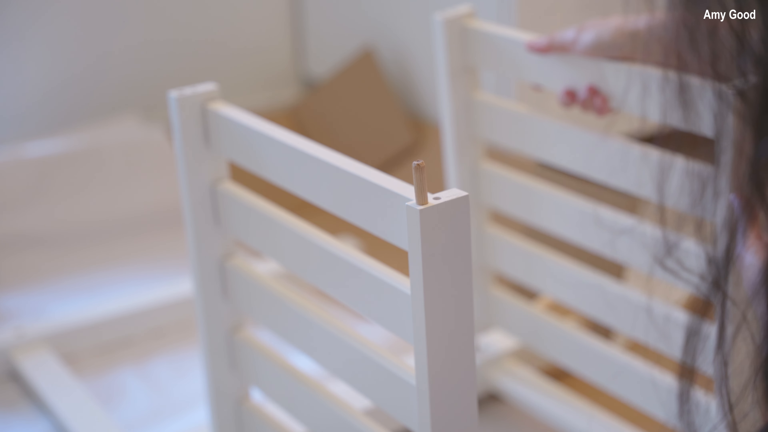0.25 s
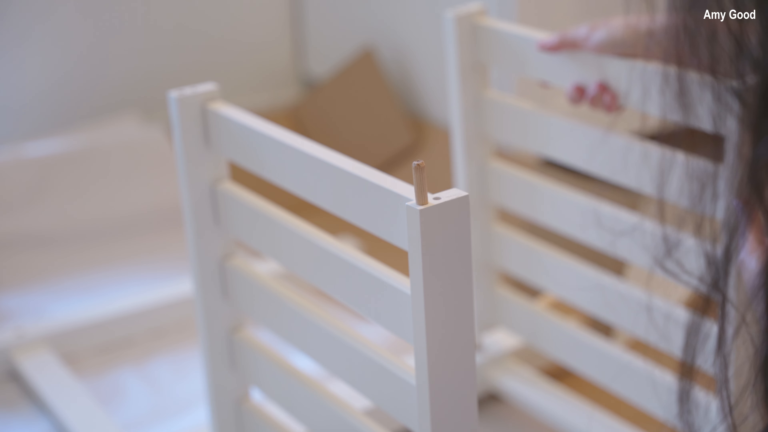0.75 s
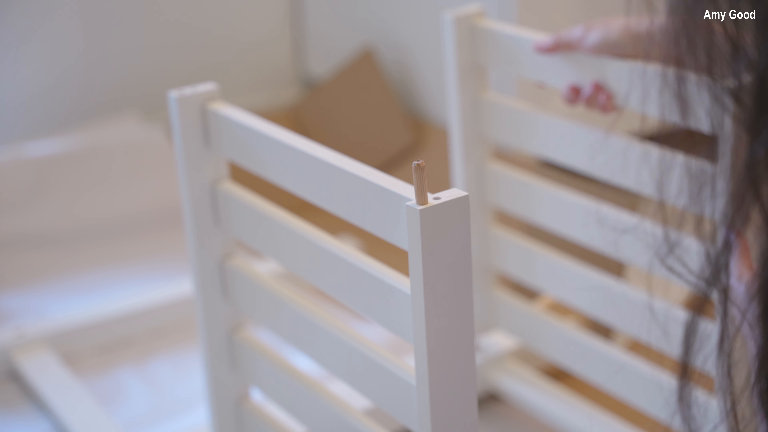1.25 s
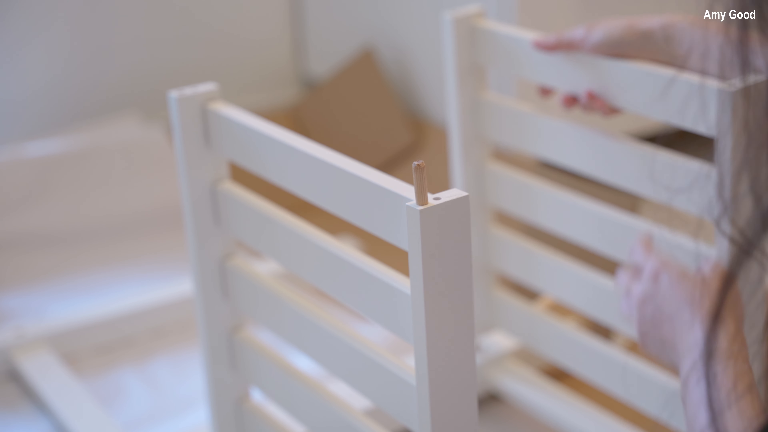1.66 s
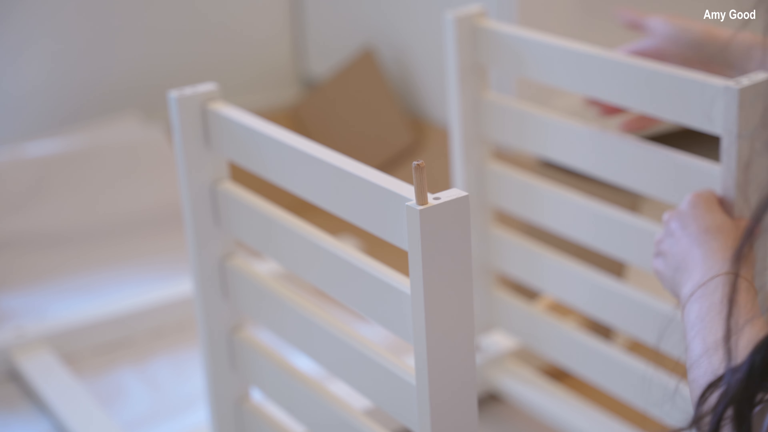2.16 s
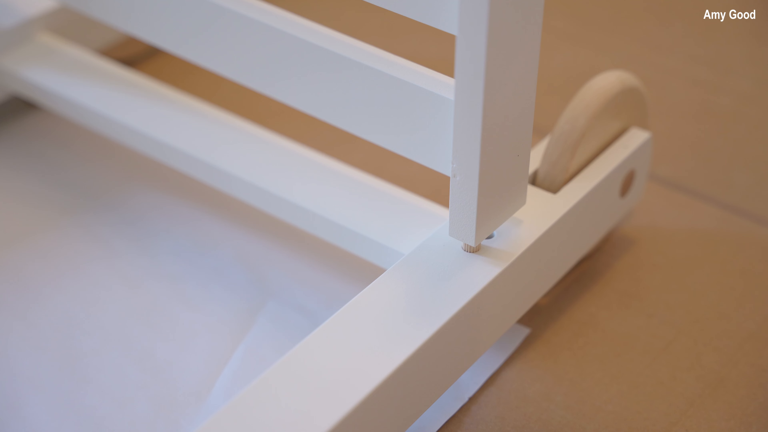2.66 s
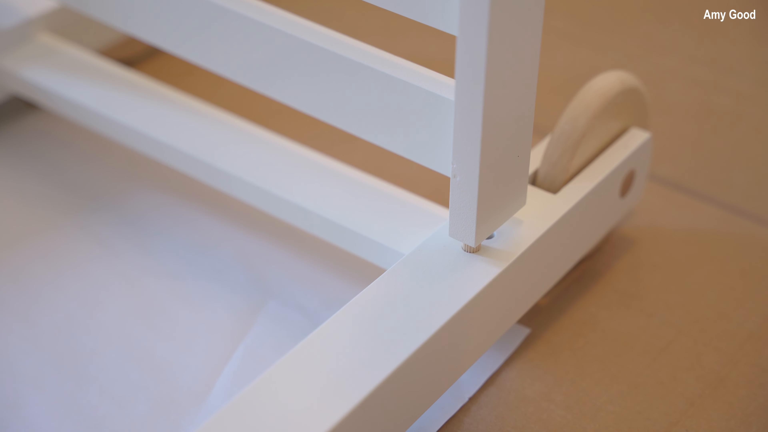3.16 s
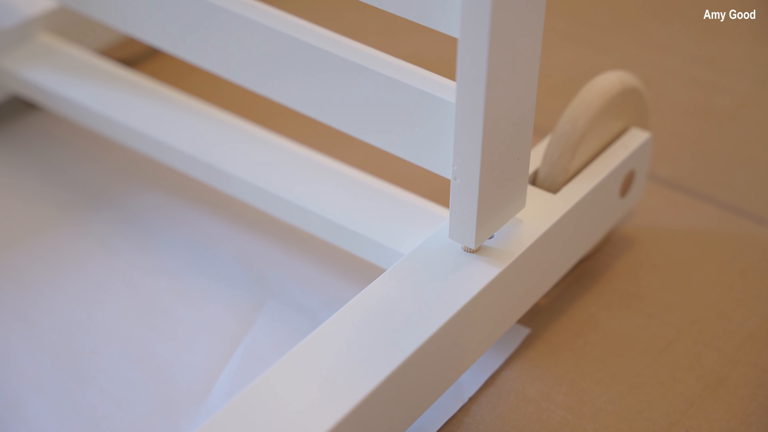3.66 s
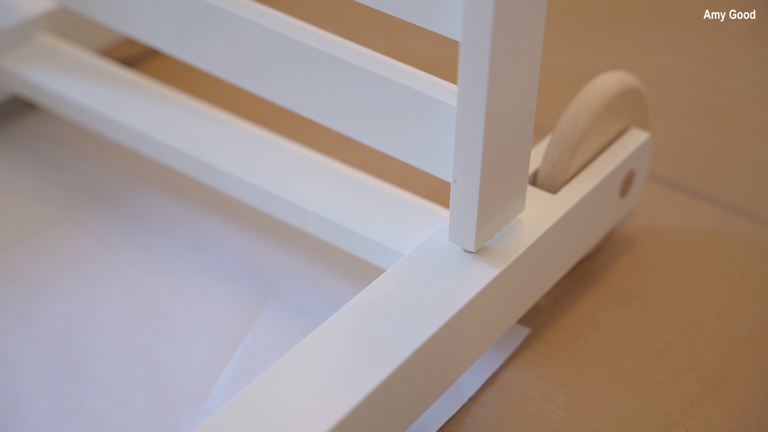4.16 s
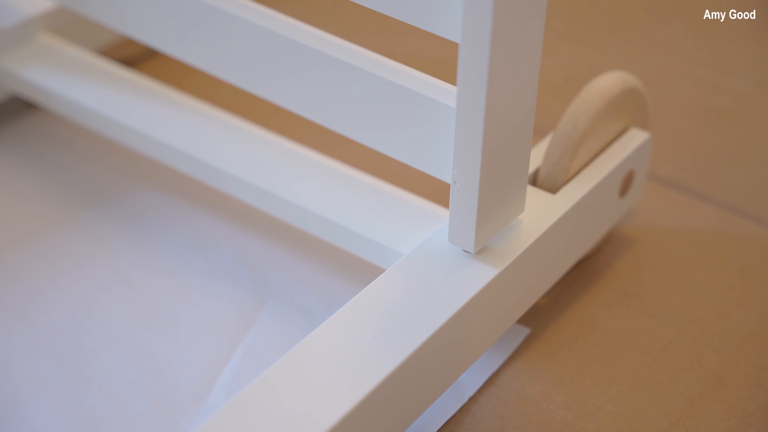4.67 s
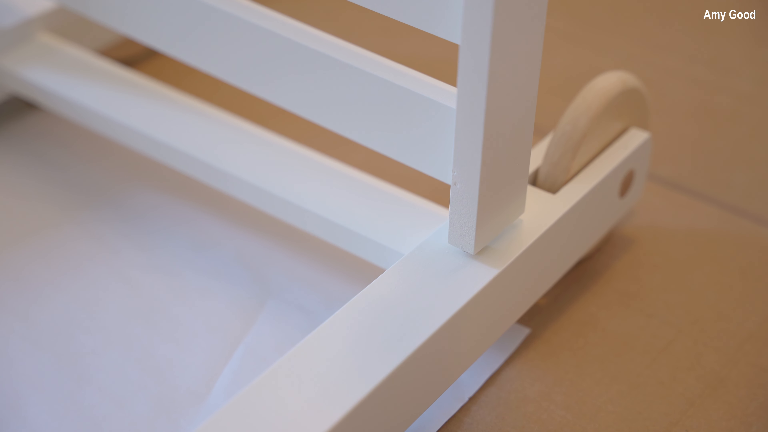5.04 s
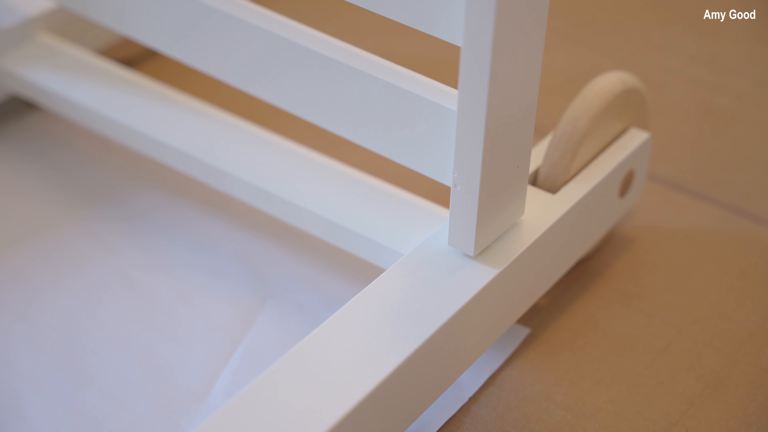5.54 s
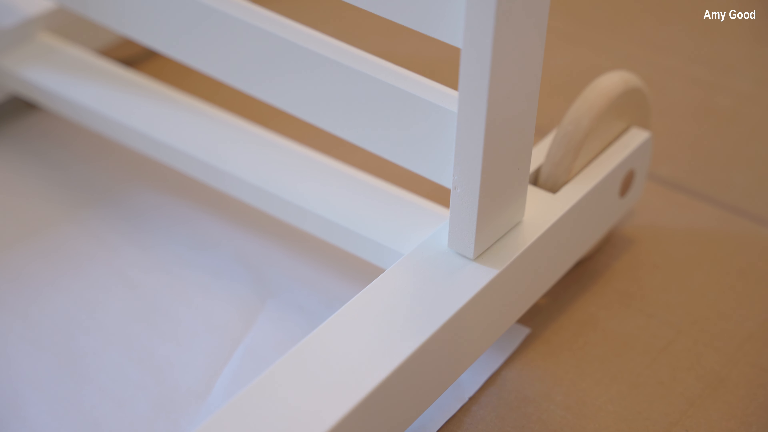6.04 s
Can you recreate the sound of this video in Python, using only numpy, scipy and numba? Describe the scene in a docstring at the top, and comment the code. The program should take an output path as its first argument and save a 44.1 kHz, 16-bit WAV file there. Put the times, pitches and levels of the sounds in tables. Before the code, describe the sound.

Faint, steady air noise fills a bare, reverberant room. For the first three seconds, hands quietly position the painted panels of a wooden furniture frame. The loose joints give light knocks and ticks around 0.2 to 0.5 seconds and again from 1 to 1.2 seconds, with a brief low scuff on the floor. Smaller ticks follow near 1.8 seconds, and very soft rubbing continues until about 2.7 seconds.

At 3 seconds a rubber mallet begins driving a dowelled joint home, much louder than the handling. Eight evenly paced blows land at roughly 3.0, 3.5, 3.9, 4.4, 4.8, 5.2, 5.6 and 6.1 seconds. The first is a little softer; the rest are similar in strength, varying slightly in brightness. Each combines a woody thud with little bass, a sharp clack and a slight ring, with room echo swelling just afterwards and fading within about half a second.

```python
"""In a bare, live room, a rubber mallet drives home the dowelled post of a wooden furniture frame.
Over faint air noise, hands first rub and shift the panels, and the slipping joints knock and tick.
Eight evenly paced blows follow. Each is a thud of the frame's damped modes, a clack as the dowel
slips and a wash of reverberation; a limiter ducks the attack, so the room swells up after it."""
import sys
import numpy as np
from scipy import signal
from scipy.fft import rfft, irfft
from scipy.io import wavfile
from scipy.ndimage import map_coordinates
from numba import njit

SR = 44100
rng = np.random.default_rng(int(sys.argv[2]) if len(sys.argv) > 2 else 0)


def master_out(mix):
    """Clip the mix to full scale and print it as 16-bit PCM to the path in sys.argv[1]."""
    frames = np.transpose(np.atleast_2d(mix))
    ceiling = np.clip(frames, -1, 1)
    pcm = np.round(ceiling * 32767).astype(np.int16)
    wavfile.write(sys.argv[1], SR, pcm)


N = 277830
T = np.arange(int(.9 * SR)) / SR  # time axis of one impact, s
HZ = np.maximum(np.fft.rfftfreq(len(T), 1 / SR), 1)  # its frequency axis


def undb(db):
    """Amplitude ratio of a level in decibels."""
    return 10 ** (np.asarray(db) / 20)


def unit_energy(x):
    """Normalisation to the energy of 5 ms at full level."""
    return x * np.sqrt(.005 * SR / np.sum(x ** 2))


def lookup(points, hz):
    """Interpolation of (frequency, value) points on a logarithmic frequency axis."""
    points_hz, values = np.transpose(points)
    return np.interp(np.log(np.maximum(hz, 1)), np.log(points_hz), values)


def decay(t60_s):
    """Exponential damping: the level falls 60 dB in t60_s."""
    return np.exp(-np.log(1000) * T / t60_s)


def resonance(hz, width_hz):
    """Lorentzian power response of one damped resonator."""
    return 1 / (1 + (2 * (HZ - hz) / width_hz) ** 2)


def colour(x, gain_db):
    """Minimum-phase filtering: folding the cepstrum makes the response causal."""
    cepstrum = irfft(np.log(undb(gain_db)), len(T))
    cepstrum[1:len(T) // 2] *= 2
    cepstrum[len(T) // 2:] = 0
    response = irfft(np.exp(rfft(cepstrum)), len(T))
    return signal.fftconvolve(x, response)[:len(T)]


def add(track, start_s, x):
    """Superposition of a sound on the track from start_s."""
    start = int(start_s * SR)
    track[start:start + len(x)] += x[:N - start]


# spectrum of the air noise: frequency_hz, relative_db
AIR_SPECTRUM = [(25, -28), (50, -24), (85, -15.5), (125, -13), (200, -6.5), (280, -1), (450, -8.5),
                (750, -13), (1100, -15), (2100, -21), (4000, -29), (7500, -30.5), (15500, -27.5)]
# narrow peaks added to it: pitch_hz, width_hz, relative_db
AIR_DRONE = [(120, 10, 4), (280, 17, -1.5), (533, 15, 6.5), (628, 13, 9.5), (840, 8.9, 13.5)]

def room_tone(level_db=-59.5, waver_db=0.52):
    """Spectrally shaped noise: the low, steady air of the house, with a faint drone and hiss."""
    drone = sum(undb(db) ** 2 * resonance(hz, width_hz) for hz, width_hz, db in AIR_DRONE)
    gain = undb(lookup(AIR_SPECTRUM, HZ)) * np.sqrt(1 + drone)
    noise = rfft(rng.standard_normal(N))
    air = irfft(noise * np.interp(np.fft.rfftfreq(N, 1 / SR), HZ, gain), N)
    drift = signal.resample(rng.standard_normal(40), N)
    return air / np.std(air) * undb(level_db + waver_db * drift)


# rubs of hands on paint and, lowest, of a panel on the floor:
# middle_s, length_s, level_db, centre_hz, width_octaves
RUBS = [(.455, 0.075, -66, 6370, .3), (1.064, 0.081, -53, 130, 2.5), (1.76, 0.65, -67.5, 1300, 1.6),
        (2.28, 0.31, -68, 2400, 1.4), (2.597, 0.23, -63.5, 2000, 1.27)]

def rubbing(grip_db=3, edge_drop_db=10):
    """Stick-slip friction: skin or floor catches on painted wood, in rubs that swell and fade."""
    out, t = np.zeros(N), np.arange(N) / SR
    hz = np.maximum(np.fft.rfftfreq(N, 1 / SR), 1)
    noise = rng.standard_normal(N)
    grip = undb(grip_db * signal.resample(rng.standard_normal(2500), N))
    grains = rfft(noise * grip)
    for middle_s, length_s, level_db, centre_hz, width_octaves in RUBS:
        band = np.exp(-.5 * (np.log2(hz / centre_hz) / width_octaves) ** 2)
        hiss = irfft(grains * band, N)
        swell_db = -edge_drop_db * (2 * (t - middle_s) / length_s) ** 2
        out += hiss / np.std(hiss) * undb(level_db + swell_db)
    return out


# reverberation time of the room: frequency_hz, t60_s
ROOM_DECAY = [(80, 0.61), (210, 0.32), (560, 0.47), (1500, 0.6), (3900, 0.55), (10000, 0.43), (15000, 0.41)]

def reverberation(early_db=-2.0, walls_s=0.023, build_s=0.0032):
    """Diffuse reflection: weak floor echoes, then wall echoes, each band dying at its own rate."""
    noise, echoes = rfft(rng.standard_normal(len(T))), 0
    centres_hz = np.geomspace(60, 16000, 12)
    for hz, weights in zip(centres_hz, np.eye(len(centres_hz))):
        band = np.interp(np.log(HZ), np.log(centres_hz), weights)
        echoes += irfft(noise * band, len(T)) * decay(lookup(ROOM_DECAY, hz))
    walls = np.clip((T - walls_s) / build_s, 0, 1)
    return echoes * undb(early_db * (1 - walls)) * np.minimum(T / build_s, 1)


def crack(decay_s):
    """Broadband excitation: a burst of dying noise, whitened and then tapered."""
    spectrum = rfft(rng.standard_normal(len(T)) * decay(decay_s))
    return irfft(spectrum / np.abs(spectrum), len(T)) * decay(4 * decay_s)


def modal_ripple(spacing_hz=130):
    """Modal overlap: the frame's many upper modes give random peaks and dips at each contact point."""
    heights = rng.standard_normal(600)
    return map_coordinates(heights, [HZ / spacing_hz], mode="mirror")


# modes of the slats, which answer light knocks: pitch_hz, width_hz, relative_db
SLAT_MODES = [(1077, 42, -4), (1640, 130, -3.5), (1894, 130, -1.5), (2546, 190, -2.5), (3514, 54, -3),
              (3940, 45, 0.5), (4130, 77, -5), (5300, 40, -34), (5830, 60, -12), (7200, 63, -9),
              (9200, 200, -15)]
# joints knocking under the hands: start_s, level_db, centre_hz
JOINT_KNOCKS = [(0.2317, -50, 3180), (0.2557, -34, 560), (0.2617, -41, 2730), (0.3926, -47, 2470),
                (0.481, -44, 2460), (.9818, -39.5, 2460), (1.0784, -49, 8000), (1.0943, -52, 4000),
                (1.2054, -35.5, 2600), (1.241, -34, 2540), (1.6283, -53, 3600), (1.791, -50, 6000),
                (1.8205, -47, 5000), (1.839, -44.5, 3400), (2.064, -52, 1900)]

def joint_knocks(tick_s=0.038, slats_db=11.0, ripple_db=3.5, wood_top_hz=11000, skirt_db=-31,
                 room_db=-8.5, room_top_hz=5500, settle_s=(.012, .022), settle_db=-12):
    """Impulse response: a slipping joint rings slats and room, then settles with a weaker slip."""
    out = np.zeros(N)
    room = unit_energy(colour(reverberation(), -10 * np.log10(1 + (HZ / room_top_hz) ** 4)))
    slats = sum(undb(db + slats_db) ** 2 * resonance(hz, width_hz) for hz, width_hz, db in SLAT_MODES)
    wood_db = 10 * np.log10((1 + slats) / (1 + (HZ / wood_top_hz) ** 6))
    for start_s, level_db, centre_hz in JOINT_KNOCKS:
        # bandwidth grows with the centre: slowly for dull knocks, fast for sharp ticks
        sharpness = np.log2(centre_hz / 2530)
        upper_octaves = 0.78 + max(0.17 * sharpness, 1.2 * sharpness)
        octaves = upper_octaves * np.where(HZ < centre_hz, 1.54, 1)  # wider below the centre
        contact_db = np.maximum(-3 * (np.log2(HZ / centre_hz) / octaves) ** 2, skirt_db)
        for delay_s, slip_db in [(0, 0), (rng.uniform(*settle_s), settle_db)]:
            slip = unit_energy(crack(tick_s)) + undb(room_db) * room
            knock = colour(slip, contact_db + wood_db + ripple_db * modal_ripple())
            add(out, start_s + delay_s, undb(level_db + slip_db) * unit_energy(knock))
    return out


# narrow resonances of wood and room: pitch_hz, relative_db
RINGING_MODES = [(69, -22), (107, -21), (174, -21), (266, -17), (322, -12), (541, -1), (584, -7), (637, -6),
                 (753, -7), (842, -7), (1275, -5), (1418, -2), (1876, -1), (2024, 0), (2069, -3),
                 (2112, -3), (2524, -2), (2600, -2), (3030, -4), (3071, -6), (3413, -9), (3461, -10),
                 (3504, -10), (4468, -16), (4834, -20), (5569, -18)]

def ringing(scatter_db=3.0, detune=0.00163, build_s=0.0031, t60_s=0.44):
    """Free vibration: lightly damped resonances outlast a blow and die about as slowly as the room."""
    tones = 0
    for hz, db in RINGING_MODES:
        gain = undb(db + scatter_db * rng.standard_normal())
        pitch_hz = hz * (1 + detune * rng.standard_normal())
        tones += gain * np.sin(2 * np.pi * (pitch_hz * T + rng.random()))
    return unit_energy(tones * decay(t60_s) * (1 - np.exp(-T / build_s)))


# damped modes of the frame: pitch_hz, width_hz, relative_db
FRAME_MODES = [(250, 130, -32), (464, 66, -7.5), (650, 140, 1), (740, 87, -11.5), (960, 31, -23.5),
               (1282, 59, -5), (1731, 79, -0.5), (1818, 77, -4.5), (2165, 83, -3), (2450, 84, 0.5),
               (2580, 176, 1.5), (3047, 70, -7), (3450, 100, -12.5), (4900, 150, -17)]

def frame_thud(scatter_db=2.0, detune=0.024, radiate_hz=380):
    """Modal superposition, varying with the spot struck; narrow slats radiate little bass."""
    modes = 0
    for k, (hz, width_hz, db) in enumerate(FRAME_MODES):
        gain = (-1) ** k * undb(db + scatter_db * rng.standard_normal())
        pitch_hz = hz * (1 + detune * rng.standard_normal())
        modes += gain * np.exp(-np.pi * width_hz * T) * np.sin(2 * np.pi * pitch_hz * T)
    radiation = signal.butter(2, radiate_hz, "high", fs=SR, output="sos")
    return unit_energy(signal.sosfilt(radiation, modes))


# spectrum of the reverberant wash: frequency_hz, relative_db
WASH_SPECTRUM = [(24, -69), (40, -27.5), (69, -22.5), (199, -13), (320, -9.5), (392, -8.5), (529, -2.5),
                 (942, -4), (2050, -0.5), (2320, -4.5), (2570, -3), (3220, -9), (5580, -18), (12800, -41),
                 (16000, -41)]
# spectrum of the joint's clack: frequency_hz, relative_db
CLACK_SPECTRUM = [(120, -63), (200, -12), (548, -0.5), (749, 11.5), (1080, -16.5), (2330, -4.5),
                  (3900, -4.5), (7540, -6.5), (9750, -17.5), (13100, -30), (16000, -11.5)]
# blows, brighter when square, each landing spot favouring one resonance:
# start_s, force_db, treble_db, favoured_hz
MALLET_BLOWS = [(3.0203, -6.5, -2, 1860), (3.4503, -2, -0.5, 2560), (3.9103, -2, 3.5, 2560),
                (4.352, -1.4, -0.9, 1300), (4.8263, -1.84, -1.5, 1790), (5.2402, -1.1, 1.2, 1550),
                (5.649, -2, -0.4, 2240), (6.0594, -1.74, 2.5, 3010)]

def mallet_blows(wash_db=1.0, ring_db=-6.0, ripple_db=2.23, repeat_share=0.55,
                 clack_db=-1.16, clack_growth=1.86, clack_lag_s=.0007, clack_s=0.0081,
                 bass_db=-0.84, bass_hz=550, treble_hz=3000, favoured_db=2.0):
    """Impact excitation: the frame thuds, the joint clacks as the dowel slips, and the room answers."""
    out, room, ripple = np.zeros(N), reverberation(), modal_ripple()
    # the frame shifts between blows, so its modes and echo pattern only partly repeat
    same, fresh = np.sqrt([repeat_share, 1 - repeat_share])
    for start_s, force_db, treble_db, favoured_hz in MALLET_BLOWS:
        tone_db = bass_db / (1 + (HZ / bass_hz) ** 2) + treble_db / (1 + (treble_hz / HZ) ** 2)
        tone_db += favoured_db * resonance(favoured_hz, width_hz=220)
        echoes = same * room + fresh * reverberation()
        modes_db = ripple_db * (same * ripple + fresh * modal_ripple()) * np.minimum(HZ / treble_hz, 1)
        wash = unit_energy(colour(echoes, lookup(WASH_SPECTRUM, HZ) + modes_db))
        tail = undb(wash_db) * wash + undb(ring_db) * ringing()
        clack = unit_energy(colour(crack(clack_s), lookup(CLACK_SPECTRUM, HZ) + modes_db))
        add(out, start_s, undb(force_db) * colour(frame_thud() + tail, tone_db))
        # a harder blow slips the dowel further, so the clack grows faster than the thud
        add(out, start_s + clack_lag_s, undb(clack_growth * force_db + clack_db) * clack)
    return out


def scene():
    """Superposition of blows, knocks, rubs and room tone in one channel."""
    return (mallet_blows() + joint_knocks() + rubbing() + room_tone())[None]


@njit
def peak_envelope(x, attack, release):
    """Peak detection: the envelope rises quickly and falls slowly."""
    out, level = np.empty(len(x)), 0.
    for i in range(len(x)):
        level += max(abs(x[i]) - level, 0.) * attack - level * release
        out[i] = level
    return out


def record(dry, threshold_db=-1.5, attack_s=0.00013, release_s=0.053, ceiling=0.77,
           band_hz=(36, 13500), cutoff_hz=15800):
    """Limiting ducks each blow, saturation rounds the peaks that slip past, and filters trim the band."""
    envelope = peak_envelope(dry[0], 1 - np.exp(-1 / (attack_s * SR)), 1 / (release_s * SR))
    limited = dry / np.maximum(envelope / undb(threshold_db), 1)
    rounded = limited / (1 + (limited / ceiling) ** 6) ** (1 / 6)
    gentle_band = signal.butter(2, band_hz, "band", fs=SR, output="sos")
    steep_lowpass = signal.ellip(8, .2, 80, cutoff_hz, fs=SR, output="sos")
    return signal.sosfilt(steep_lowpass, signal.sosfilt(gentle_band, rounded))


dry = scene()
out = record(dry)
master_out(out)
```